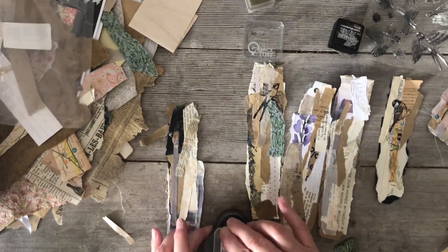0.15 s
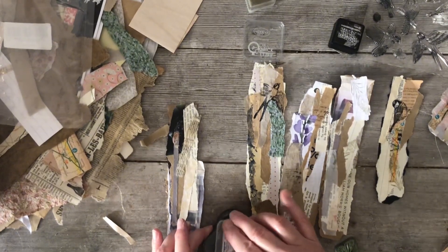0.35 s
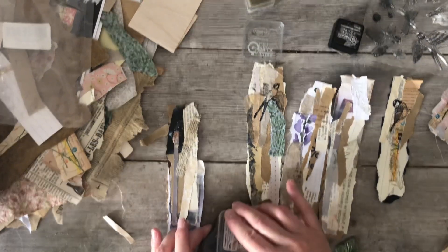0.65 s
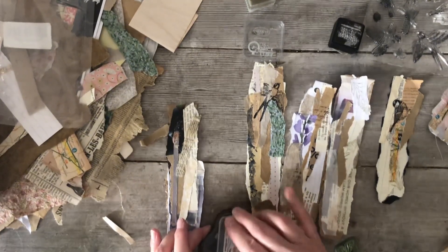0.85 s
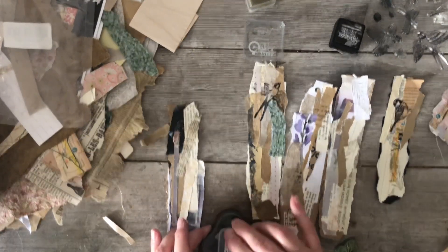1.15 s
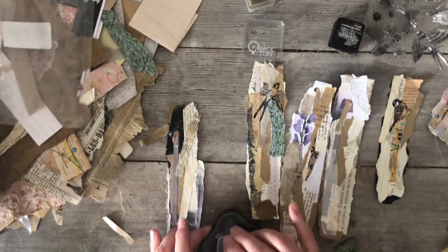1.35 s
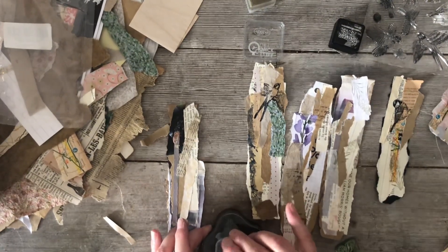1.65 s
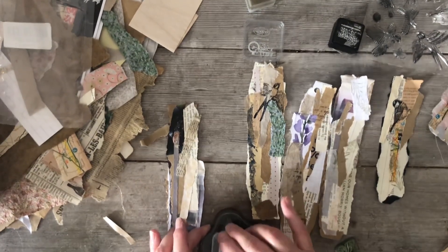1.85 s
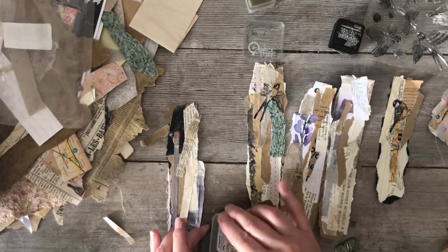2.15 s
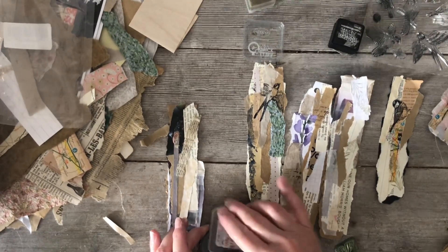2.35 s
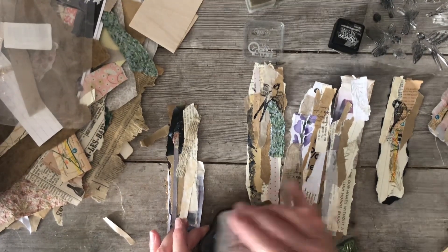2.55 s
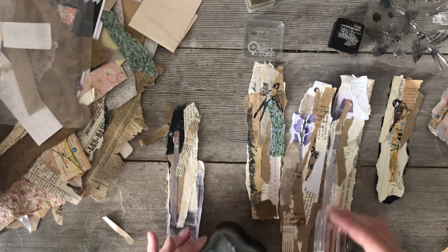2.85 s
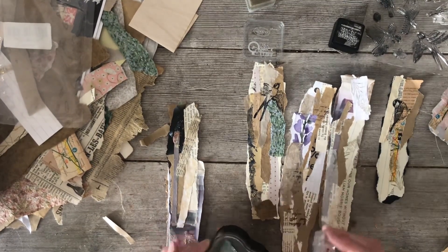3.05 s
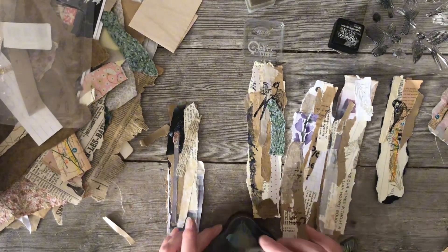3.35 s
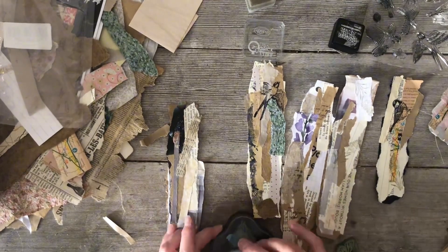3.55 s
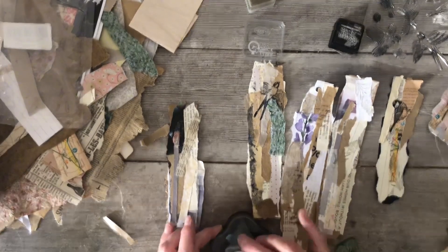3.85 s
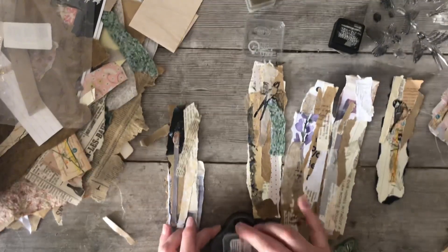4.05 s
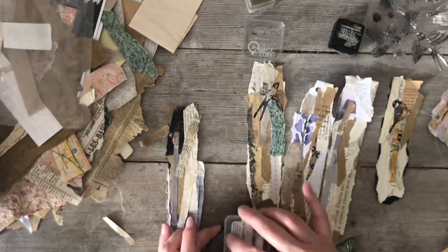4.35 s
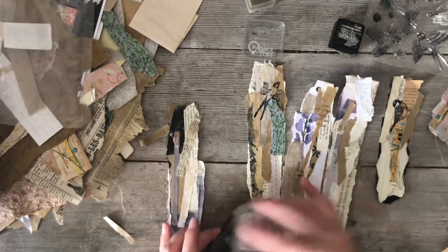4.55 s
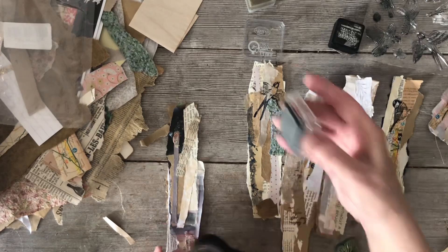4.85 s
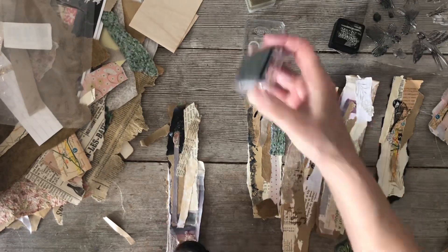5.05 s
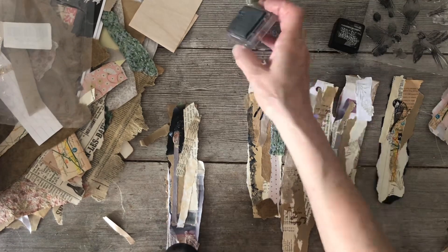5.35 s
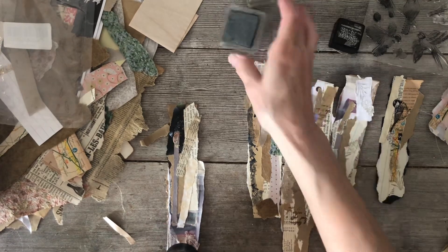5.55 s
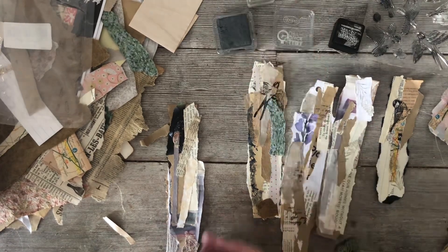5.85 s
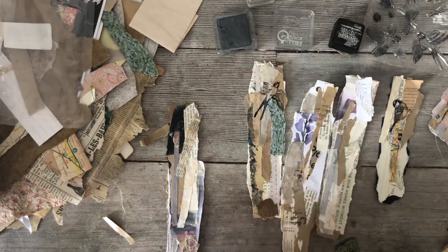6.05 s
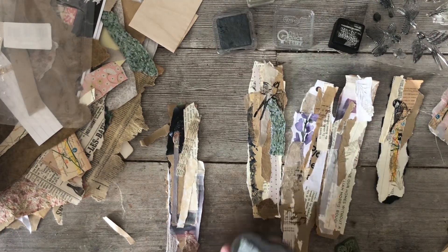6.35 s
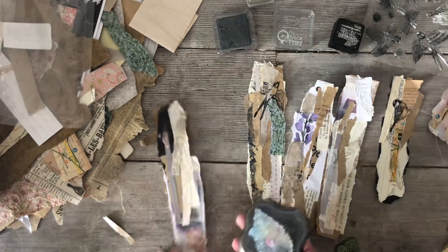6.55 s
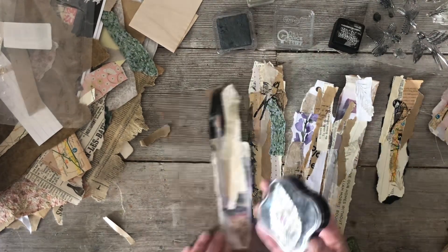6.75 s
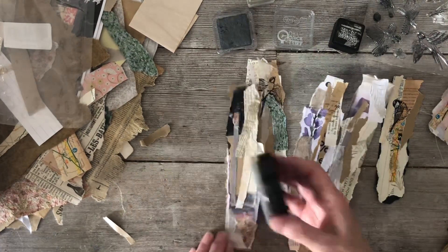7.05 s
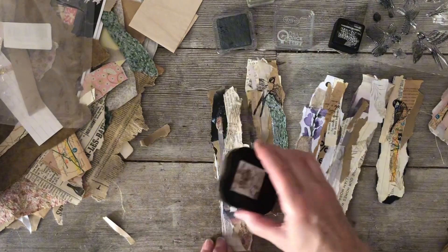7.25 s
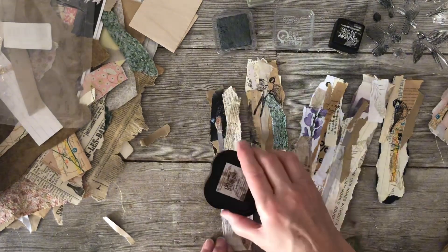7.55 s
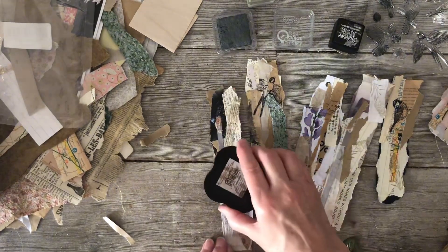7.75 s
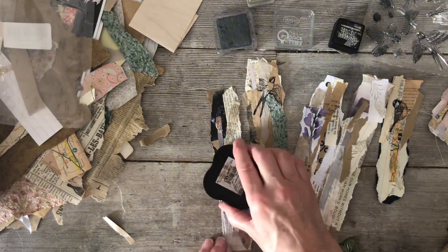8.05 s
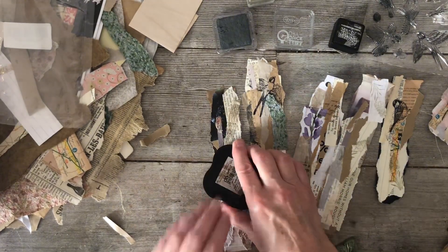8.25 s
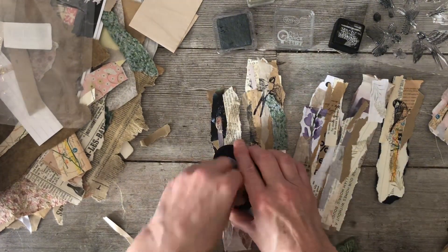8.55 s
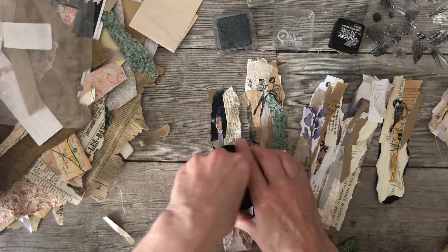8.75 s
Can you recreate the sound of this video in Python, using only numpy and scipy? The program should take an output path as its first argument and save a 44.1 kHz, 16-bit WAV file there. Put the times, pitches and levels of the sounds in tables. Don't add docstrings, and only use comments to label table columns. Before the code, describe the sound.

Close to a wooden desk in a small room, an ink pad in a plastic case dabs a rubber stamp: clicks, small woody knocks, soft thuds and sticky peels. The case is then set down with a loud, hard clatter and brief scrape. Paper rustles across the boards, and the stamp is pressed with light taps and tiny creaks. A faint hum and distant engine lie beneath.

```python
import sys
import numpy as np
from scipy import signal
from scipy.fft import rfft, irfft, next_fast_len
from scipy.io import wavfile
from scipy.ndimage import uniform_filter1d, map_coordinates

SR = 44100
rng = np.random.default_rng(int(sys.argv[2]) if len(sys.argv) > 2 else 0)


def linear_from_db(decibels):
    return 10 ** (np.asarray(decibels, float) / 20)


def unload_wav(signal):
    wavfile.write(
        sys.argv[1],
        SR,
        np.round(np.clip(np.atleast_2d(signal).T, -1, 1) * 32767).astype(np.int16),
    )


N = 392931


def unit(x):
    return x / np.sqrt(np.mean(x ** 2) + 1e-20)


def along(points, hz):
    f, v = np.transpose(points)
    return np.interp(np.log(hz + 1), np.log(f + 1), v)


def filtered(x, gain):
    n = x.shape[-1]
    m = next_fast_len(n)
    return irfft(rfft(x, m) * gain(np.fft.rfftfreq(m, 1 / SR)), m)[..., :n]


def add(track, s, x):
    part = track[round(s * SR):][:len(x)]
    part += x[:len(part)]


def wobble(rate, count=N):
    knots = rng.standard_normal(int(count * rate / SR) + 4)
    return map_coordinates(knots, [np.arange(count) * rate / SR])


def resonances(rows):
    return lambda f: sum(gain / (1 + ((f - hz) / (width / 2)) ** 2) for hz, width, gain in rows)


def rush(spectrum, patchy_db, grain_db=0, count=N):
    grain = linear_from_db(grain_db * wobble(900, count)) if grain_db else 1
    z = signal.stft(rng.standard_normal(count) * grain, nperseg=512)[2]
    field = uniform_filter1d(rng.standard_normal(z.shape), 6, 0)
    field = uniform_filter1d(field, 12, 1)
    x = signal.istft(z * linear_from_db(patchy_db * unit(field)), nperseg=512)[1][:count]
    closed = [(spectrum[0][0] / 2, -90), *spectrum, (spectrum[-1][0] * 2, -90)]
    coloured = filtered(x, lambda hz: linear_from_db(along(closed, hz)))
    return np.resize(unit(coloured), N)


def swells(rows):
    t = np.arange(N) / SR
    out = np.zeros((len(rows[0][3:]), N))
    for s, rise, fall, *db in rows:
        near = slice(max(0, round((s - 6 * rise) * SR)), round((s + 6 * fall) * SR))
        side = np.where(t[near] < s, rise, fall)
        shape_db = -9 * (np.abs(t[near] - s) / side) ** 1.5
        out[:, near] += linear_from_db(np.array(db)[:, None] + shape_db)
    return out


def ring(modes, attack, scatter_db, lean_db=0, free=1, spread=0.016, loose=0):
    hz, db, t60 = np.transpose(modes)[:, :, None]
    luck = rng.standard_normal((3, len(modes), 1))
    t = np.arange(round(t60.max() * SR)) / SR
    turn = 2 * np.pi * (hz * (1 + spread * luck[1]) * t + loose * luck[2])
    level_db = db + lean_db + scatter_db * luck[0] - 60 * t / (free * t60)
    x = (linear_from_db(level_db) * np.sin(turn)).sum(axis=0) * (1 - np.exp(-t / attack))
    return x / np.abs(x).max()


def click(hz, t60, width, top_hz, spike=4.3):
    t = np.arange(SR // 20) / SR
    burst = linear_from_db(-60 * t / t60) * (rng.standard_normal(len(t)) + spike * (t == 0))
    x = signal.lfilter(*signal.iirpeak(min(hz, .45 * SR), 1 / max(width, .7), SR), burst)
    x = signal.lfilter(*signal.butter(2, min(top_hz, .45 * SR), fs=SR), x)
    return x / np.abs(x).max()


# pitch_hz [Hz], level_db [dB], t60_s [s]
BLOCK_MODES = [(295.7, -3, 0.053), (476.5, -4, 0.055), (699, -3, 0.0491), (1090, -10, 0.067),
               (1600, -1.5, 0.039), (2300, -8.5, 0.014), (3324, -8.5, .016)]


def knock(attack, favoured_hz=700):
    hz, db, t60 = np.transpose(BLOCK_MODES)
    crowd = np.geomspace(hz[0], hz[-1], num=30)
    crowd_db = along(np.transpose([hz, db]), crowd)
    crowd_t60 = along(np.transpose([hz, t60]), crowd)
    lean_db = -6 * np.abs(np.log2(crowd / favoured_hz))[:, None]
    modes = np.transpose([crowd, crowd_db, crowd_t60])
    x = ring(modes, attack, scatter_db=0.8, lean_db=lean_db, spread=.03, loose=0.98)
    return signal.lfilter(*signal.butter(2, hz[0] / 2, 'high', fs=SR), x)


# start_s [s], rumble_db [dB]
RUMBLE_COURSE = [(0, -77), (1.1, -72.5), (1.6, -75.5), (2.4, -72), (2.9, -76), (4.3, -76.5), (4.8, -74.5),
                 (6.001, -71.5), (6.7, -66.5), (7.4, -68.5), (8.91, -65)]
# pitch_hz [Hz], density_db [dB per Hz]
HUM_SPECTRUM = [(25, -24.5), (50, -8.5), (68, -3), (82, -5.5), (100, 1), (125, -16.5), (160, -12.5),
                (200, -15.5)]
# pitch_hz [Hz], density_db [dB per Hz]
RUMBLE_SPECTRUM = [(140, -18.5), (230, -7.5), (300, -1), (360, -4.5), (450, -4), (600, -17)]
# pitch_hz [Hz], density_db [dB per Hz]
TRAFFIC_SPECTRUM = [(350, -20.5), (600, -2), (750, -2), (1000, -7.5), (1150, -10), (1300, -8.5),
                    (2500, -17.5), (4000, -22)]
# pitch_hz [Hz], width_hz [Hz], level_db [dB]
ENGINE_LINES = [(285, 42, -0.5), (354, 24, 1.5), (483, 15, -1), (516, 9.9, -10.5), (625, 7, -4),
                (989, 8.2, -7.5), (1070, 11, -4)]
HUM_DB, HUM_FOLLOWS, TRAFFIC_DB, TRAFFIC_FOLLOWS = -70, 0.42, -74.5, 0.27


def air():
    rumble_db = np.interp(np.arange(N) / SR, *np.transpose(RUMBLE_COURSE))
    hum = linear_from_db(HUM_DB + HUM_FOLLOWS * (rumble_db + 71.0))
    traffic = linear_from_db(TRAFFIC_DB + TRAFFIC_FOLLOWS * (rumble_db + 70.0))
    lines = resonances([(hz, width, linear_from_db(db)) for hz, width, db in ENGINE_LINES])
    engine = unit(filtered(rng.standard_normal(N), lines))
    house = linear_from_db(-1.0) * rush(RUMBLE_SPECTRUM, .7, count=5 * SR)
    out = hum * linear_from_db(6.0 + 1.1 * wobble(2)) * rush(HUM_SPECTRUM, 0.79, count=5 * SR)
    out += linear_from_db(rumble_db) * (house + linear_from_db(-0.5) * engine)
    return out + traffic * linear_from_db(2.0) * rush(TRAFFIC_SPECTRUM, 1.2, count=5 * SR)


# start_s [s], fall_s [s], crackle_db [dB], pocket_db (trapped air) [dB]
SQUEEZES = [(0.142, 0.0098, -49.5, -44), (0.577, 0.021, -55, -73), (0.834, 0.025, -59, -50.5),
            (1.076, 0.0028, -41, -36.5), (1.175, .004, -64, -67), (1.291, 0.019, -61, -68),
            (1.52, 0.019, -60.5, -60.5), (1.885, 0.014, -68.5, -60.5), (2.248, 0.033, -69, -62),
            (2.363, 0.015, -59.5, -50.5), (3.246, 0.01, -40.5, -34.5), (3.81, 0.011, -58.5, -57.5),
            (4.009, 0.011, -56.5, -83), (4.1, 0.0055, -74, -68), (4.397, 0.015, -61, -54.5),
            (5.951, 0.0054, -77, -67), (8.168, 0.016, -69, -66.5), (8.41, 0.011, -73.5, -44.5)]
# start_s [s], length_s [s], crackle_db [dB], bright_db [dB]
PEELS = [(0.074, 0.018, -65.5, -2), (0.28, 0.007, -65.5, -5), (.354, 0.0071, -68, -1),
         (0.498, 0.0053, -65.5, -5.5), (0.73, 0.0044, -60.5, 5), (0.75, 0.009, -67, -8),
         (0.96, 0.0085, -62, -5), (1.205, 0.013, -61, -1.5), (1.438, 0.011, -63.5, -1.5),
         (1.651, 0.0076, -58.5, -1), (1.766, 0.011, -59.5, 0), (1.961, 0.007, -70, 1),
         (2.079, 0.0082, -67, -3.5), (2.164, 0.013, -73, 10), (2.278, 0.0078, -66.5, 10),
         (2.494, .012, -60.5, -4), (3.578, 0.0083, -60, 3.5), (3.693, 0.0058, -64.5, -2.5),
         (3.854, 0.0062, -70, -5), (4.025, 0.005, -59.5, -1.5), (4.211, 0.0075, -56.5, -1.5),
         (4.26, 0.013, -72, 3), (4.311, 0.0064, -67, -1), (4.503, 0.0088, -57, 4.5),
         (4.561, 0.012, -63, 21.5)]
# start_s [s], length_s [s], crackle_db [dB], bright_db [dB]
SCUFFS = [(6.107, .011, -75, 11), (6.221, 0.032, -70.5, -1.5), (6.442, 0.0056, -65.5, -3),
          (6.769, 0.0062, -66, 20), (7.883, 0.013, -76, 18), (8.483, 0.021, -63.5, -2),
          (8.598, 0.0086, -55, -0.5), (8.626, 0.016, -65.5, 0)]
# start_s [s], level_db [dB], pitch_hz [Hz]
SNAPS = [(0.4627, -58.5, 5400), (0.706, -51, 5190), (0.727, -56.5, 4480), (0.743, -39.5, 2480),
         (0.8674, -56, 2650), (0.942, -44.5, 5700), (1.1724, -57, 2560), (1.417, -53.5, 4140),
         (1.6329, -44.5, 4070), (1.8671, -46, 4060), (2.064, -47.5, 4070), (2.2438, -35, 3700),
         (2.4618, -49.5, 2550), (2.4896, -38.5, 4600), (2.499, -49, 2700), (3.0933, -60, 11600),
         (3.573, -58, 3200), (3.691, -50.5, 3030), (4.3088, -48, 2810), (4.531, -44, 3490),
         (4.546, -41, 11500), (4.553, -44.5, 11300), (4.5587, -32, 2700), (4.62, -59, 5200),
         (4.746, -55, 10000), (4.8645, -53, 9500), (4.91, -60, 9500)]
# start_s [s], level_db [dB], pitch_hz [Hz]
FLICKS = [(5.9469, -47, 3430), (6.1455, -55, 5500), (6.176, -65, 3200), (6.2185, -43, 4300),
          (6.4394, -47.5, 4200), (6.6433, -42, 6080), (6.549, -56, 11500), (6.578, -58, 12000),
          (6.895, -49, 12000), (6.905, -56.5, 10500), (6.999, -52, 13500), (7.009, -54, 13000),
          (7.222, -56, 14000), (8.166, -48.5, 2790), (8.4548, -44.5, 3310), (8.528, -53, 3750),
          (8.5812, -54, 3200), (8.598, -51, 3700), (8.6035, -48, 2700), (8.609, -53, 4500),
          (8.622, -52, 2500), (8.717, -57, 1480), (8.888, -55, 1300)]
# pitch_hz [Hz], density_db [dB per Hz]
CRACKLE_SPECTRUM = [(900, -23), (1500, -0.5), (3000, 1), (5000, -2), (7000, -12), (9000, -19)]
# pitch_hz [Hz], density_db [dB per Hz]
FIZZ_SPECTRUM = [(5000, -13), (7500, -1.5), (12000, -1), (15500, -5), (16300, -9)]
SQUEEZE_RISE_S, SQUEEZE_FIZZ_DB, FIZZ_GROWS = 0.0023, -69, 0.7
PEEL_RISE, PEEL_FIZZ_DB, PEEL_POCKET_DB, POCKET_YIELDS = 1, -9, -1.5, 1.7


def ink():
    rows = []
    for s, fall, db, pocket_db in SQUEEZES:
        fizz_db = SQUEEZE_FIZZ_DB + FIZZ_GROWS * (db + 59.0)
        rows.append((s, SQUEEZE_RISE_S, fall, db, fizz_db, pocket_db))
    for s, length, db, bright_db in PEELS + SCUFFS:
        fizz_db = db + PEEL_FIZZ_DB + bright_db
        pocket_db = db + PEEL_POCKET_DB - POCKET_YIELDS * bright_db
        rows.append((s, PEEL_RISE * length, length, db, fizz_db, pocket_db))
    crackle, fizz, trapped = swells(rows)
    pocket = [(600, -1.5), (800, -4.5), (890, 4.5), (1000, -0.5), (1300, -7.0)]
    out = crackle * rush(CRACKLE_SPECTRUM, 1.3, grain_db=1.5, count=3 * SR)
    out += fizz * rush(FIZZ_SPECTRUM, 2.2, grain_db=4.5, count=3 * SR)
    out += trapped * rush(pocket, 0.68, count=3 * SR)
    for s, db, hz in SNAPS + FLICKS:
        add(out, s + 0.00088, linear_from_db(db) * click(hz, t60=0.0153, width=0.62, top_hz=15500))
    return out


# start_s [s], click_db [dB], pitch_hz (click) [Hz], knock_db [dB], thud_db [dB]
DABS = [(0.14, -26.5, 2780, -42.5, -47), (0.3473, -51.5, 2500, -48, -51), (0.576, -34, 2930, -38, -62),
        (0.581, -37, 1960, -39.5, -48), (0.834, -27, 2750, -35.5, -43), (1.072, -35, 1520, -34, -40.5),
        (1.289, -57, 2580, -55.5, -51.5), (1.5138, -40.5, 3000, -61, -59.5), (1.7501, -45, 4380, -54, -46),
        (2.145, -49.5, 1570, -49, -50), (2.362, -39.5, 1710, -42, -47.5), (3.239, -22, 2270, -28, -50),
        (3.2439, -19.5, 2580, -35, -52), (3.555, -48, 3450, -50, -57), (3.8072, -44, 3500, -53, -48.5),
        (4.006, -43.5, 3100, -49, -50.5), (4.198, -47.5, 2090, -53.5, -46.5), (4.3977, -45, 1850, -42, -49),
        (6.199, -60, 2180, -66.5, -60), (6.4151, -66, 3000, -62, -52), (7.8812, -47.5, 5614, -78, -50),
        (8.4074, -30.5, 4430, -50, -48), (8.758, -60, 7000, -71, -54.5), (8.9014, -36.5, 3660, -43, -58)]
# start_s [s], level_db [dB], pitch_hz [Hz], t60_s [s]
CREAKS = [
    (6.134, -67, 3150, 0.028),
    (6.175, -65, 2150, .03),
    (6.183, -65, 3290, .05),
    (6.2, -64, 1340, 0.1),
    (6.238, -64, 1340, .1),
]
# pitch_hz [Hz], level_db [dB], t60_s [s]
DESK_MODES = [(72.6, -6, 0.18), (100.7, -4.5, 0.19), (144.5, -5.5, .12), (231, -8, .1), (309, -9.5, 0.1093)]
KNOCK_HZ, KNOCK_OCT_PER_DB = 650, .055
BOTTOM_S, BOTTOM_HZ, BOTTOM_DB = 0.005335, 460, 0


def dabs():
    out = np.zeros(N)
    for s, db, hz, knock_db, thud_db in DABS:
        knock_hz = KNOCK_HZ * 2 ** (KNOCK_OCT_PER_DB * (knock_db - thud_db - 6.5))
        bottom_db = (knock_db + thud_db) / 2 + BOTTOM_DB
        thud = ring(DESK_MODES, attack=0.0079, scatter_db=0.7, spread=0.031, free=0.69)
        add(out, s + 0.00076, linear_from_db(db) * click(hz, t60=0.014, width=0.64, top_hz=5500, spike=5.7))
        add(out, s + 0.001184, linear_from_db(knock_db + 2) * knock(attack=1.9 / knock_hz, favoured_hz=knock_hz))
        add(out, s + BOTTOM_S, linear_from_db(bottom_db) * knock(attack=0.00099, favoured_hz=BOTTOM_HZ))
        add(out, s + 0.0024, linear_from_db(thud_db + 5.5) * thud)
    for s, db, hz, t60 in CREAKS:
        pair = [(hz, 0, t60), (0.96 * hz, -8, t60)]
        add(out, s, linear_from_db(db) * ring(pair, attack=0.0017, scatter_db=1.5, spread=0.0037))
    return out


# pitch_hz [Hz], level_db [dB], t60_s [s]
STAMP_MODES = [(485, 0, .055), (655, -7, .04), (1430, -10, .04)]
# start_s [s], level_db [dB], pitch_hz [Hz], t60_s [s]
BUMPS = [
    (6.199, -50.5, 267, .07),
    (6.419, -52.5, 330, 0.062),
    (6.432, -50.5, 224, 0.064),
    (8.1, -51, 294, 0.054),
    (8.58, -50.5, 3200, .02),
    (8.598, -48, 2500, 0.03),
    (8.6, -49, 3750, 0.034),
    (8.599, -49, 1110, 0.035),
    (8.597, -52, 6200, 0.033),
]
STAMP_DB = -5.5


def block():
    out = np.zeros(N)
    for s, _, _, knock_db, _ in DABS:
        body = ring(STAMP_MODES, attack=0.0028, scatter_db=1, spread=0.011)
        add(out, s + 0.002994, linear_from_db(knock_db + STAMP_DB) * body)
    for s, db, hz, t60 in BUMPS:
        pair = [(hz, 0, t60), (1.326 * hz, -8, .7 * t60)]
        add(out, s, linear_from_db(db) * ring(pair, attack=0.0026, scatter_db=5.0))
    return out


# start_s [s], level_db [dB], pitch_hz (favoured) [Hz], crack_db [dB], upper_hz [Hz]
CLATTER = [(5.235, -24.5, 3600, -14.5, 4450), (5.2435, -33.5, 2100, -30, 3500),
           (5.293, -23.5, 1870, -32, 2740), (5.3091, -27.5, 2140, -37, 2800),
           (5.3262, -33.5, 1300, -25.5, 2660), (5.3563, -31.5, 1750, -36, 2400),
           (5.4164, -55, 1300, -0.5, 5000), (5.4466, -23, 1340, -28, 2300), (5.4815, -28, 1340, -20, 2300),
           (5.5012, -29, 1380, -22.5, 2300), (5.508, -27.5, 2380, -16, 3500),
           (5.5288, -17, 2535, -16, 5500), (5.5808, -36.5, 2000, -12.5, 3600),
           (5.5963, -3, 2040, -21.5, 4130), (5.6015, -15, 4100, -12, 4900),
           (5.6307, -27, 3350, -27.5, 4800), (5.6118, -27.5, 1980, -30, 3500),
           (5.652, -15.5, 1600, -35.5, 4870), (5.6544, -21, 1490, -29.5, 4870),
           (5.6652, -32, 1750, -30, 1410), (5.6846, -22, 1900, -32, 3520), (5.6971, -26, 1400, -29, 1520),
           (5.7228, -45.5, 1500, -19, 2000)]
# start_s [s], fall_s [s], desk_db [dB], plastic_db [dB]
SCRAPES = [
    (5.236, 0.094, -52, -45.5),
    (5.296, 0.044, -49, -53),
    (5.449, 0.073, -40.5, -57),
    (5.533, 0.047, -48.5, -44.5),
    (5.6, 0.099, -44.5, -54),
]
# pitch_hz [Hz], level_db [dB], t60_s [s]
CASE_MODES = [(1340, 2.5, 0.0058), (1486, -6.5, 0.052), (1750, -8.5, 0.05), (1980, -6, 0.052),
              (2100, -9, 0.051), (2338, -12.5, 0.047), (2750, -5.5, 0.025), (3450, -16.5, 0.089),
              (3670, -12, 0.057), (4120, -5, .025), (4444, -9, 0.028), (4870, -10.5, 0.02),
              (5745, -7, 0.028), (7460, -16.5, .02)]
# pitch_hz [Hz], level_db [dB], t60_s [s]
FLYING_MODES = [(2153, -9, .1), (2719, -8, .06), (3400, -18, .04), (4161, -13, .04), (5150, 2, .012),
                (5600, -2, .011), (6050, -3, .012), (7574, -12, .012), (8500, -12, .012)]
# pitch_hz [Hz], density_db [dB per Hz]
WOOD_SPECTRUM = [(120, -8.5), (300, -3.5), (700, -9.5), (1200, -6.5), (1800, -19.5)]
# pitch_hz [Hz], density_db [dB per Hz]
PLASTIC_SPECTRUM = [(600, -9), (1000, -0.5), (1500, -2.5), (2200, 3.5), (3500, -9), (5000, -13.5),
                    (9000, -17), (15000, -23)]
AIRBORNE = 5.52, 5.54
HELD_UNTIL_S, LANDED_S = 5.52, 5.1
HELD, LOOSE, LANDED = .26, .24, .24
CASE_KNOCK_DB, KNOCK_GROWS = -49.5, 0.24
DRAG_RISE_S = .0015
SCRAPE_WIDTH, SCRAPE_RING_DB = .05, -7


def case():
    desk, plastic = swells([(s, DRAG_RISE_S, *rest) for s, *rest in SCRAPES])
    rough = rush(PLASTIC_SPECTRUM, 1.5, grain_db=2.5, count=SR)
    peaks = resonances([(hz, SCRAPE_WIDTH * hz, 2) for hz, *_ in CASE_MODES])
    scrape = unit(filtered(rough, lambda f: 1 + linear_from_db(SCRAPE_RING_DB) * peaks(f)))
    out = desk * rush(WOOD_SPECTRUM, 1.7, grain_db=2.5, count=SR) + plastic * scrape
    mode_hz = np.array(CASE_MODES)[:, :1]
    for s, db, hz, crack_db, upper_hz in CLATTER:
        knock_db = CASE_KNOCK_DB + KNOCK_GROWS * (db + 24.0)
        if AIRBORNE[0] < s < AIRBORNE[1]:
            body = ring(FLYING_MODES, attack=.0006, scatter_db=.3, spread=.002)
        else:
            lower_lean_db = -24 * np.abs(np.log2(mode_hz / hz))
            upper_lean_db = -1.5 - 24 * np.abs(np.log2(mode_hz / upper_hz))
            lean_db = np.maximum(lower_lean_db, upper_lean_db)
            free = HELD if s < HELD_UNTIL_S else LOOSE if s < LANDED_S else LANDED
            body = ring(CASE_MODES, attack=0.0005, scatter_db=1.5, lean_db=lean_db, free=free, spread=.007)
        thud = ring(DESK_MODES[1:], attack=0.0057, scatter_db=5.5, free=0.91)
        add(out, s + .001, linear_from_db(db - 1.5) * body)
        add(out, s + 0.00092, linear_from_db(db - 16.5) * click(hz, t60=0.0084, width=0.97, top_hz=8970))
        add(out, s + 0.0007, linear_from_db(db + crack_db + 10.5) * click(4600, t60=0.015, width=1.2, top_hz=15960))
        add(out, s + .0008, linear_from_db(knock_db + 0.5) * knock(attack=0.002))
        add(out, s + 0.0044, linear_from_db(knock_db - 4.5) * thud)
    return out


# start_s [s], level_db [dB], rise_s [s], t60_s [s]
ROLLS = [
    (5.6014, -7.5, .003, .016),
    (5.609, -24.5, .004, 0.049),
    (5.6295, -21.5, .003, 0.011),
    (5.664, -38, 0.0024, .02),
]
# pitch_hz [Hz], level_db [dB]
HOLLOW_MODES = [(1982, 0.5), (2102, -5), (1750, -14.5), (3450, -17), (4070, -18)]


def rolls():
    out = np.zeros(N)
    for s, db, rise, t60 in ROLLS:
        modes = [(hz, level, t60) for hz, level in HOLLOW_MODES]
        add(out, s, linear_from_db(db) * ring(modes, attack=rise, scatter_db=1, spread=.003))
    return out


# start_s (peak) [s], rise_s [s], fall_s [s], rustle_db [dB], hiss_db [dB], rub_db (slow) [dB]
STROKES = [(5.98, 0.027, 0.025, -73.5, -75.5, -77), (6.27, 0.1, 0.15, -80, -83, -79),
           (6.43, 0.021, 0.17, -68.5, -72.5, -81), (6.56, 0.021, 0.083, -66, -67.5, -81),
           (6.65, 0.049, 0.052, -57, -65, -72), (6.712, 0.031, 0.016, -63, -65.5, -69),
           (6.776, 0.024, 0.022, -61.5, -62, -61.5), (6.84, 0.067, 0.069, -68.5, -70, -68.5),
           (6.95, 0.046, 0.074, -81, -82, -81), (7.04, 0.053, 0.074, -71.5, -70, -72.5),
           (7.16, 0.066, 0.077, -70, -73, -75.5), (8.46, 0.042, 0.22, -76.5, -82, -81.5)]
# pitch_hz [Hz], density_db [dB per Hz]
PAPER_SPECTRUM = [(1060, -29), (1800, -4), (2620, -10.5), (3010, -4.5), (6210, 4.5), (8860, -6.5),
                  (12400, -27), (20900, -120)]
# pitch_hz [Hz], density_db [dB per Hz]
RUB_SPECTRUM = [(2300, -18), (3100, -6), (4000, 2), (4800, -6.5), (6500, -16), (8500, -20)]


def paper():
    rustle, hiss, rub = swells(STROKES)
    catch = linear_from_db(1.5 * wobble(28))
    fine = [(7000, -2.0), (9500, 6.5), (15500, 8.0), (16300, -9.5)]
    out = rustle * rush(PAPER_SPECTRUM, 1.79, grain_db=2.5, count=SR)
    out += hiss * rush(fine, 1.8, grain_db=2.0, count=SR)
    out += rub * rush(RUB_SPECTRUM, 1.4, grain_db=2, count=SR)
    return catch * out


# pitch_hz [Hz], t60_s [s]
ROOM_DECAY = [(150, 0.49), (1000, 0.22), (4000, 0.1977), (12000, 0.05)]


def room(x):
    out, step = np.zeros(N), SR // 5
    for start in range(0, N, step):
        hz, t, z = signal.stft(rng.standard_normal(SR // 3), SR, nperseg=256)
        decay = linear_from_db(-60 * t / along(ROOM_DECAY, hz)[:, None])
        tail = signal.istft(z * decay, SR, nperseg=256)[1]
        answer = signal.fftconvolve(x[start:start + step], tail / np.linalg.norm(tail))
        add(out, start / SR + .004, answer)
    return out


ROOM_BLUR, ROOM_BLUR_HZ, BLUR_FROM_HZ = 1.3, 220, 600


def blurred(tail):
    high = filtered(tail, lambda hz: 1 / (1 + (BLUR_FROM_HZ / (hz + 1)) ** 4))
    shake = np.exp(1j * ROOM_BLUR * wobble(ROOM_BLUR_HZ))
    turning = signal.hilbert(high, next_fast_len(N))[:N] * shake
    return tail - high + turning.real


def scene():
    near = ink() + dabs() + block() + case() + rolls() + paper()
    return (near + linear_from_db(-13.5) * blurred(room(near)) + air())[None]


def roll_off(x):
    return signal.sosfilt(signal.butter(12, 16520, fs=SR, output="sos"), x)


# pitch_hz [Hz], density_db [dB per Hz]
HISS_SPECTRUM = [(800, -10.5), (2500, -2.5), (6000, 0.5), (11000, -4.5), (15200, -4.5), (15900, -17)]
MIC_HISS_DB, TOP_HZ, BASS_HZ = -80.5, 16400, 32


def record(dry):
    hiss = linear_from_db(MIC_HISS_DB) * rush(HISS_SPECTRUM, 0.65, count=3 * SR)
    response = lambda hz: (hz < TOP_HZ) / (1 + 1 / (1j * (hz + 1) / BASS_HZ)) ** 2
    return roll_off(filtered(dry + hiss, response))


dry = scene()
out = record(dry)
unload_wav(out)
```